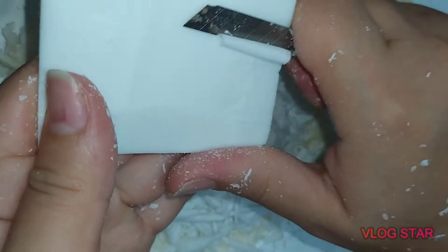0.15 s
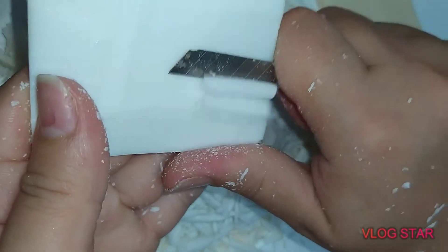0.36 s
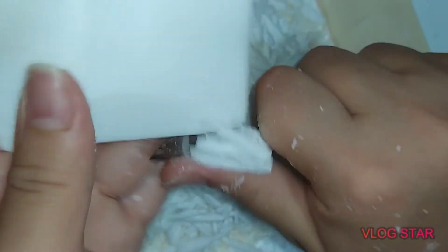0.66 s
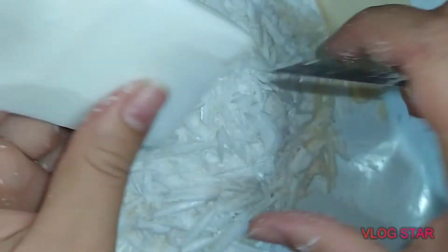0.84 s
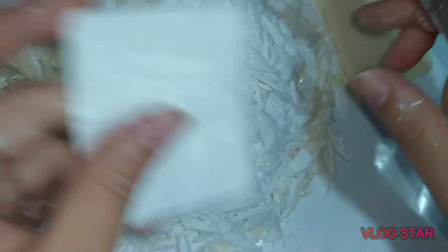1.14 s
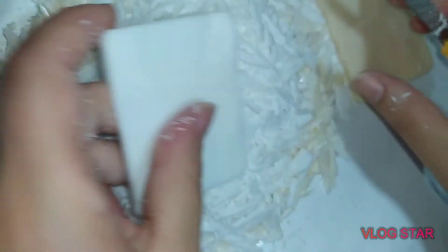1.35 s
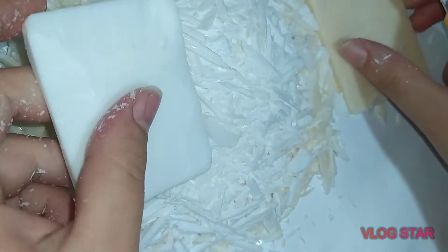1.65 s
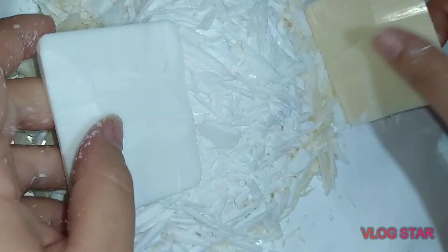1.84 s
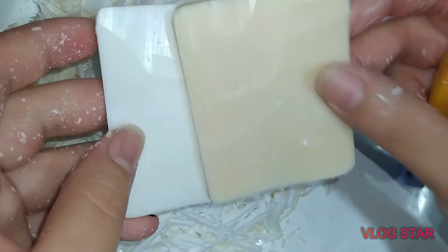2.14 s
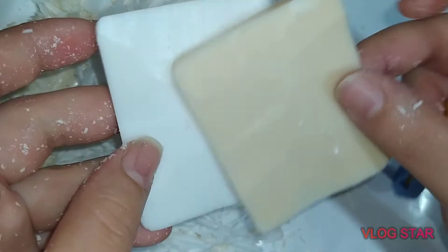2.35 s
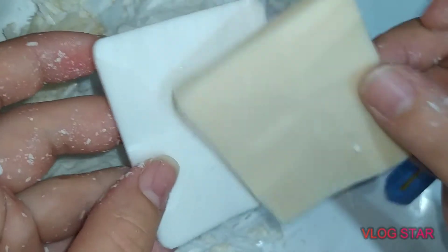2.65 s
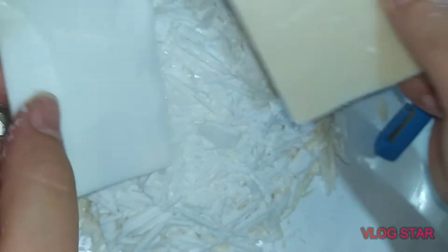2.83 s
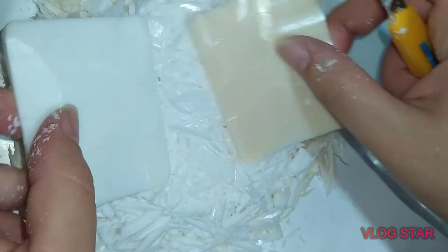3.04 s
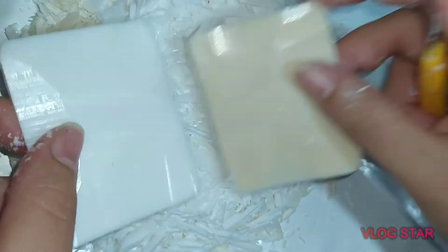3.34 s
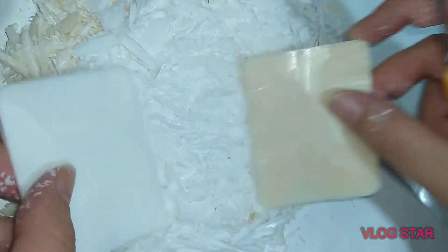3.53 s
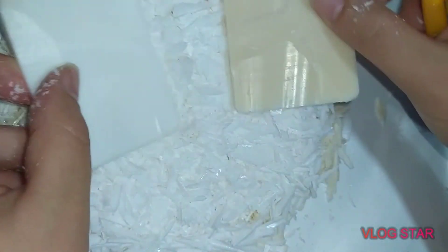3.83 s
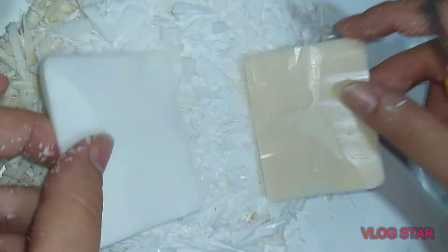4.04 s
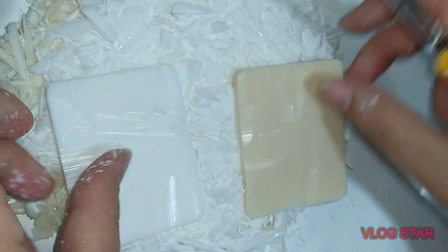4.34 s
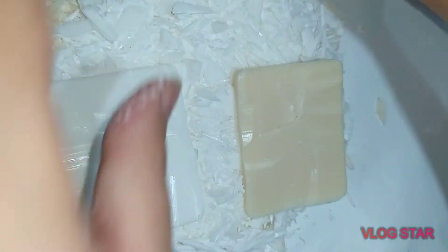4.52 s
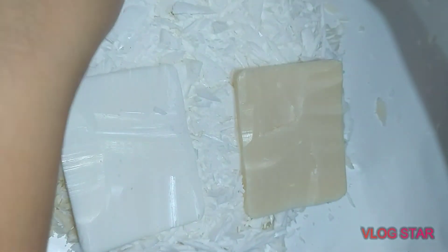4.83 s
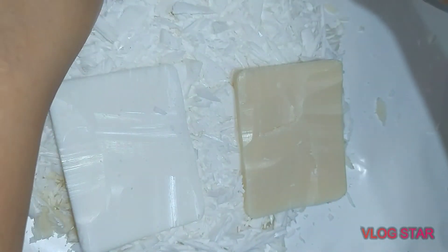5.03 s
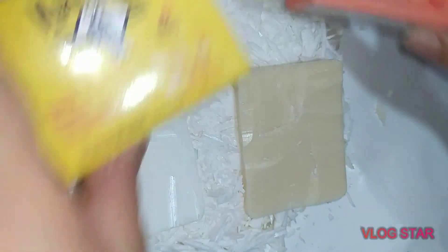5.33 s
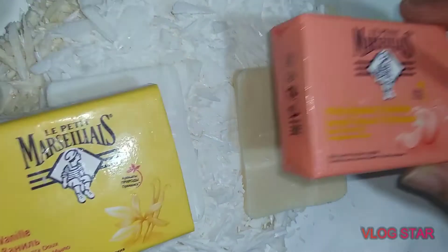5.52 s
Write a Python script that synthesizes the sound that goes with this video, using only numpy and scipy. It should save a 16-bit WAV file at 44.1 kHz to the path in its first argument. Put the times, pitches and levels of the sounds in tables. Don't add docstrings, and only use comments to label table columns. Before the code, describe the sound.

A close two-channel microphone in a small, hard, lightly reverberant room, with faint low hum, rumble and hiss throughout. From 0 to 0.9 s, soft dry blade strokes shave soap, with tiny brittle crumb ticks. A quieter gap follows, with one tick near 1.35 s. At 1.51-1.6 s the bar knocks the table in a fast uneven cluster, a short woody click over a dull thud, then a soft rub at 1.7 s. From 2.18 to 2.67 s a hollow plastic knife slider ratchets in about five clacks roughly 0.12 s apart, some with tight bounces, leaning right. A brisk rustle and light handle tap come at 2.95 s, a bright snap at 3.1 s. Soft scrapes, crumbly clicks and faint thuds continue to 4.2 s, with a barely audible low table groan. Airy rustling swells at 4.5-5.2 s, with crisp snaps at left near 4.74 and 4.84 s and gritty carton scuffs at 5.05-5.15 s, then fades.

```python
import sys
import numpy as np
from scipy import signal
from scipy.fft import rfft, irfft, next_fast_len
from scipy.io import wavfile
from scipy.ndimage import uniform_filter1d

SR = 44100
rng = np.random.default_rng(int(sys.argv[2]) if len(sys.argv) > 2 else 0)


def attenuation_scalar(level_db):
    decades = np.asarray(level_db, float) / 20
    return 10 ** decades


def store_wav(level_fs):
    pcm = np.round(np.clip(np.atleast_2d(level_fs), -1, 1) * 32767)
    wavfile.write(sys.argv[1], SR, pcm.T.astype(np.int16))


N = 250488


def evened(x):
    return x / np.sqrt(np.mean(x ** 2) + 1e-20)


def read(points, hz):
    f, value = np.transpose(points)
    return np.interp(np.log(hz + 1), np.log(f + 1), value)


def add(mix, s, sound, pan_db):
    part = mix[:, round(s * SR):][:, :sound.shape[1]]
    part += sound[:, :part.shape[1]] * attenuation_scalar(np.array([[pan_db / 2], [-pan_db / 2]]))


def coloured(x, points):
    size = next_fast_len(N)
    gain = attenuation_scalar(read(points, np.fft.rfftfreq(size, 1 / SR)))
    return evened(irfft(rfft(x, size) * gain, size)[..., :N])


def filtered(x, order, hz, kind):
    return signal.sosfilt(signal.butter(order, hz, kind, fs=SR, output="sos"), x)


def ring(modes, rise_s, spread):
    t = np.arange(4096) / SR
    hz, db, t60 = np.transpose(modes)[:, :, None]
    detune = 1 + 0.0027 * rng.standard_normal((len(modes), 1))
    phase = spread * rng.standard_normal((2, len(modes), 1))
    waves = attenuation_scalar(db - 60 * t / t60) * np.sin(2 * np.pi * hz * detune * t + phase)
    out = waves.sum(1) * (1 - np.exp(-t / rise_s))
    return out / abs(out).max()


def crack(low_hz, high_hz, t60, rise_s=0.00026):
    t = np.arange(4096) / SR
    noise = rng.standard_normal((3, 4096))
    burst = (noise[:2] + 0.48 * noise[2]) * attenuation_scalar(-60 * t / t60) * (1 - np.exp(-t / rise_s))
    out = filtered(burst, 2, [low_hz, min(high_hz, 21000)], "band")
    return out / abs(out).max()


def swell(top_s, rise_s, fall_s, db):
    t = np.arange(N) / SR - top_s
    drop_db = 17
    return attenuation_scalar(db - drop_db * np.where(t < 0, -t / rise_s, t / fall_s))


# start in seconds, then levels in dB of the hollow body,
# the shell, the latch and the crack.
SLIDER_CLACKS = [
    (2.1779, -28, -28, -25.5, -32.5),
    (2.1846, -33.5, -30, -42, -37),
    (2.302, -17.5, -34.5, -25.5, -30),
    (2.3104, -20, -30, -50, -34.5),
    (2.4293, -27.5, -38.5, -41, -46),
    (2.5397, -31.5, -35.5, -54, -70),
    (2.5465, -19.5, -36, -40, -40.5),
    (2.6561, -30, -58, -45, -47.5),
    (2.6656, -19.5, -36.5, -35, -33.5),
]
# frequency in Hz, level in dB, t60 in seconds.
KNIFE_MODES = [
    [(1351, -1.5, 0.041), (1465, -3.5, 0.066), (1535, 7.5, 0.018)],
    [(2710, -14, 0.023), (2705, 12.5, 0.0067), (3640, 2.5, 0.0015)],
    [(5280, -5.5, 0.0058), (5350, -8.5, 0.017), (5660, -6, 0.0038)],
]


def clacks():
    out, near = np.zeros((2, 2, N))
    body_modes, shell_modes, latch_modes = KNIFE_MODES
    body_pan_db, tooth_pan_db = -10, -2.5
    for s, body_db, shell_db, latch_db, crack_db in SLIDER_CLACKS:
        body = attenuation_scalar(body_db - 2.7) * ring(body_modes, 0.00084, 1.0)
        latch = attenuation_scalar(latch_db - 1) * ring(latch_modes, 0.00031, 1.0)
        shell = attenuation_scalar(shell_db + 5.5) * ring(shell_modes, 0.000087, 0.87)
        bright = attenuation_scalar(crack_db + 13) * crack(7500, 16600, 0.01)
        dull = attenuation_scalar(body_db - 1.5) * crack(630, 6400, 0.014)
        add(out, s + 0.0008, body, body_pan_db)
        add(out, s, shell + bright + dull, tooth_pan_db)
        add(near, s, latch, tooth_pan_db)
    return out, near


# start in seconds, ring level in dB, ring frequency in Hz,
# edge level in dB, left over right in dB.
FINGER_TAP = [
    (2.9694, -34, 1552, -47.5, -1.5),
]


def tap():
    out = np.zeros((2, N))
    for s, ring_db, hz, edge_db, pan_db in FINGER_TAP:
        handle = attenuation_scalar(ring_db + 2.5) * ring([(hz, 0, 0.045), (1450, -9, 0.03)], 0.00022, 0.5)
        edge = attenuation_scalar(edge_db + 12) * crack(570, 7200, 0.011)
        add(out, s, handle + edge, pan_db)
    return out


# start in seconds, then levels in dB of the bar ring, the table thud
# and the crack, left over right in dB.
BAR_KNOCKS = [(1.511, -46, -51.5, -50.5, -4.5), (1.5375, -42, -31, -68, -18), (1.5454, -65, -51, -66, 3),
              (1.5558, -31.5, -74, -43.5, -1.5), (1.5624, -19, -31.5, -43, 7),
              (1.5821, -25.5, -28.5, -52.5, -12.5), (1.5902, -40, -30.5, -66, 13),
              (1.598, -39, -70, -53, -8), (1.923, -63, -47, -70, -7), (2.9016, -75, -44.5, -69, -7.5),
              (3.5672, -66, -49.5, -73, -5.5), (3.874, -61, -47.5, -72, -3), (3.8504, -43.5, -40, -76, -3)]
# frequency in Hz, level in dB, t60 in seconds.
KNOCK_MODES = [
    [(1884, 5, 0.0073), (2355, 8, 0.0062), (2510, 8.5, 0.0059), (2633, 1, 0.016), (3500, -24, 0.0074)],
    [(161.7, -20.5, 0.13), (223.6, -11.5, 0.18), (296, 0.5, 0.076), (347, 7, 0.035), (455.4, 6.5, 0.036),
     (530, 1.5, 0.043), (719, -4.5, 0.06), (1030, -20, 0.027)],
]


def knocks():
    out, table = np.zeros((2, 2, N))
    bar_modes, table_modes = KNOCK_MODES
    for s, bar_db, thud_db, crack_db, pan_db in BAR_KNOCKS:
        thud = filtered(ring(table_modes, 0.004, 0.4), 2, 130, "high")
        add(table, s, attenuation_scalar(thud_db - 3.5) * thud, -1.5)
        bar = attenuation_scalar(bar_db + 2.1) * ring(bar_modes, 0.00019, 0.79)
        dull = attenuation_scalar(bar_db - 4) * crack(550, 3900, 0.013)
        bright = attenuation_scalar(crack_db + 11) * crack(4000, 16000, 0.027)
        add(out, s, bar + dull + bright, pan_db)
    return out, table


# top in seconds, rise in seconds, fall in seconds,
# fine rustle in dB, coarse scrape in dB.
RUB_STROKES = [(0.03, 0.14, 0.35, -66, -74.5), (0.275, 0.016, 0.049, -58, -69.5),
               (0.46, 0.11, 0.33, -63, -75), (0.5, .03, 0.035, -58, -66), (0.7, 0.27, 0.45, -62.5, -93),
               (0.87, 0.31, 0.18, -65, -70), (1.43, 0.23, 0.06, -60, -73), (1.73, 0.17, 0.079, -54, -63.5),
               (1.949, 0.45, 0.12, -62.5, -68), (2.949, 0.069, 0.2, -50, -65),
               (3.2, 0.37, 0.15, -60.5, -65.5), (3.54, 0.11, 0.27, -58, -66.5),
               (3.93, 0.17, 0.16, -55.5, -65), (3.85, 0.041, 0.034, -56, -61.5),
               (4.2, 0.068, .15, -79, -69.5), (4.43, .05, 0.11, -60, -93), (4.545, 0.054, 0.11, -50.5, -84),
               (4.62, .1, 0.1, -46.5, -67), (4.86, 0.24, 0.083, -58, -73.5), (5.06, .1, 0.12, -47, -64.5),
               (5.17, 0.15, 0.087, -48, -65.5), (5.39, .05, .06, -63, -87), (5.58, 0.32, 0.16, -66, -79)]
# frequency in Hz, level in dB per Hz.
FINE_RUSTLE = [(2350, -31), (4000, -11.5), (6090, -12), (8700, -11.5), (9230, -10.5), (14100, -2.5),
               (16100, -7.5), (16500, -47)]
COARSE_SCRAPE = [(410, -20), (700, 2), (917, -9), (1050, -6), (1530, -0.5), (1870, -6), (2670, -6),
                 (5400, -17.5), (7000, -13), (9100, -75), (15400, -120)]


def rubbing():
    size = attenuation_scalar(1.6 * np.minimum(rng.exponential(1, (2, 1, N)), 5))
    happens = rng.random((2, 1, N)) < 9000 / SR
    slips = rng.standard_normal((2, 3, N)) * size * happens
    ports = slips[:, :2] + 0.22 * slips[:, 2:]
    fine, coarse = coloured(ports[0], FINE_RUSTLE), coloured(ports[1], COARSE_SCRAPE)
    out = np.zeros((2, N))
    for top_s, rise_s, fall_s, fine_db, coarse_db in RUB_STROKES:
        slipping = attenuation_scalar(fine_db - 9) * fine + attenuation_scalar(coarse_db + 1) * coarse
        out += swell(top_s, rise_s, fall_s, 0) * slipping
    clump_s, clump_db, pan_db = 0.007, 1.3, -1
    clumps = evened(uniform_filter1d(rng.standard_normal(N), round(clump_s * SR)))
    return out * attenuation_scalar(clump_db * clumps) * attenuation_scalar(np.array([[pan_db], [-pan_db]]) / 2)


# start in seconds, dull snap in dB, ring
# frequency in Hz, fine snap in dB.
SMALL_TICKS = [(0.078, -59.5, 3200, -58), (0.0997, -53.5, 3500, -56.5), (0.1712, -63, 1610, -60),
               (0.2605, -64, 1640, -54.5), (0.2636, -48, 4300, -53), (0.2895, -56, 3310, -58),
               (0.489, -49.5, 1140, -55), (0.5017, -48.5, 1380, -56.5), (0.619, -55, 2010, -57),
               (0.6274, -53, 1410, -52), (0.723, -50.5, 4300, -53), (1.3583, -45, 3460, -55),
               (2.7937, -46, 1440, -63), (2.911, -55, 1550, -53), (3.2313, -55, 1680, -65),
               (3.4401, -45, 3530, -56), (3.5653, -57, 1620, -55), (3.7855, -59, 2820, -57),
               (3.8491, -43.5, 2060, -76), (4.1066, -43, 3750, -46), (4.119, -58, 1570, -58),
               (4.618, -59, 1390, -57), (5.0434, -50, 1770, -55), (5.0524, -49, 1780, -65),
               (5.0964, -49.5, 1720, -66), (5.1437, -38.5, 1920, -49), (5.153, -52, 4450, -56),
               (5.6317, -56.5, 1370, -86)]


def ticks():
    out = np.zeros((2, N))
    for s, dull_db, hz, fine_db in SMALL_TICKS:
        middle_db = min(dull_db, fine_db) - 5
        modes = [(hz, 0, 0.009), (1560, -3, 0.012), (3500, -5, 0.008)]
        dull = attenuation_scalar(1.5) * ring(modes, 0.000082, 0.87) + crack(1100, 3600, 0.02, 0.0011)
        middle = attenuation_scalar(middle_db + 6) * crack(5000, 10000, 0.037, 0.0014)
        fine = attenuation_scalar(fine_db + 6.5) * crack(12000, 17000, 0.026, 0.0016)
        add(out, s, attenuation_scalar(dull_db - 1.5) * dull + middle + fine, -1.5)
    return out


# start in seconds, fine snap in dB, middle snap in dB,
# left over right in dB.
WRAPPER_SNAPS = [
    (1.5315, -50, -47, 4),
    (3.096, -43, -57.5, 2),
    (4.7418, -44, -63, 9.0),
    (4.8405, -37, -58.5, 9.0),
    (4.907, -50, -58, 0),
]


def snaps():
    out = np.zeros((2, N))
    modes = [(13800, -6, 0.0071), (15150, 4, 0.0071), (16200, -9, 0.006)]
    for s, fine_db, middle_db, pan_db in WRAPPER_SNAPS:
        fine = attenuation_scalar(fine_db + 2) * ring(modes, 0.00036, 0.42)
        middle = attenuation_scalar(middle_db + 12) * crack(5500, 12500, 0.0024)
        add(out, s, fine + middle, pan_db)
    return out


# top in seconds, level in dB.
BOX_SCUFFS = [
    (5.052, -49),
    (5.096, -53.5),
    (5.146, -52),
    (5.175, -65),
    (5.21, -67),
]
# frequency in Hz, level in dB per Hz.
CARTON = [(700, -32), (1050, 6), (1350, -36), (1780, 11), (1950, 4), (2400, -20), (4000, -33.5)]


def boxes():
    size = attenuation_scalar(3 * np.minimum(rng.exponential(1, N), 4))
    happens = rng.random(N) < 700 / SR
    grit = rng.standard_normal((2, N)) * size * happens
    rise_s, fall_s = 0.02, 0.014
    return coloured(grit, CARTON) * sum(swell(s, rise_s, fall_s, db) for s, db in BOX_SCUFFS)


def lean():
    spectrum = [(60, -49.0), (95, 15), (115, 5), (135, -7), (200, -42)]  # Hz, dB per Hz
    return coloured(rng.standard_normal(N), spectrum) * swell(4.186, 0.12, 0.15, -65)


# frequency in Hz, t60 in seconds.
ROOM_DECAY = [(200, 0.58), (600, 0.54), (1500, 0.38), (4000, 0.59), (12000, 0.43)]


def room(x, gap_s):
    taps = np.zeros((2, SR))
    slots = np.arange(200, SR - 20, 12)
    at = slots + rng.integers(0, 12, (2, len(slots)))
    np.put_along_axis(taps, at, rng.choice([-1., 1.], at.shape), 1)
    hz, t, z = signal.stft(taps, SR, nperseg=256)
    alike = np.clip(1.9 / (1 + (hz / 900) ** 4), 0, 1)[:, None]
    z[1] = alike * z[0] + np.sqrt(1 - alike ** 2) * z[1]
    decay = attenuation_scalar(-60 * t / read(ROOM_DECAY, hz)[:, None]) * (1 - np.exp(-t / gap_s))
    tail = signal.istft(z * decay, SR, nperseg=256)[1]
    return signal.fftconvolve(x, tail / np.linalg.norm(tail[0]), axes=1)[:, :N]


# frequency in Hz, level in dB per Hz.
QUIET_ROOM = [(3.5, -23), (6.0, 5), (17, -2.5), (129, -22.5), (192, -21.5), (242, -19.5), (397, -22.5),
              (484, -21), (696, -24.5), (820, -28), (2140, -35), (3740, -33.5), (6140, -39), (13600, -43),
              (16000, -36)]
# frequency in Hz, width in Hz, level in dB.
APPLIANCE_HUM = [(108.7, 12, -77.5), (143, 10, -80), (188, 6, -73.5), (341, 17, -75.5), (392.8, 8.8, -72),
                 (447.2, 3.8, -75)]
# frequency in Hz, left-right likeness from -1 to 1.
PORT_LIKENESS = [(30, 0.025), (70, 0.13), (140, 0.6), (600, 0.53), (1300, 0.024), (15000, 0.039)]
# frequency in Hz, left over right in dB.
PORT_TILT = [(60, -2.5), (180, 0), (550, 1.5), (1650, -2), (4970, 1.5), (15000, -5.5)]


def quiet():
    frames, hz = N // 1024 + 5, np.fft.rfftfreq(4096, 1 / SR)
    a, b, c, d, patches = rng.standard_normal((frames, 2049, 5)).T
    patches = evened(uniform_filter1d(uniform_filter1d(patches, 30, 0), 4, 1))
    same = np.clip(read(PORT_LIKENESS, hz), -1, 1)[:, None]
    left = a + 1j * b
    right = same * left + np.sqrt(1 - same ** 2) * (c + 1j * d)
    right = right * attenuation_scalar(-read(PORT_TILT, hz))[:, None]
    broad = attenuation_scalar(read(QUIET_ROOM, hz)) ** 2
    power = attenuation_scalar(-61 + 0.8) ** 2 * broad / broad.sum()
    for f, width, db in APPLIANCE_HUM:
        band = 1 / (1 + (2 * (hz - f) / width) ** 2) ** 2
        power = power + attenuation_scalar(db) ** 2 * band / band.sum()
    z = np.array([left, right]) * np.sqrt(power)[:, None] * attenuation_scalar(0.76 * patches)
    return np.sqrt(power.sum()) * evened(signal.istft(z, nperseg=4096, noverlap=3072)[1][:, :N])


def scene():
    (slider, latch), (bar, table), crumbs, rub = clacks(), knocks(), ticks(), rubbing()
    slider = slider + tap()
    wet = attenuation_scalar(-4) * (slider + attenuation_scalar(-9) * latch) + attenuation_scalar(-3) * bar + attenuation_scalar(-3.5) * table
    wet = wet + attenuation_scalar(-1.5) * crumbs + attenuation_scalar(-14.5) * rub
    direct = slider + latch + bar + table + crumbs + rub + snaps() + boxes()
    return direct + room(wet, 0.0016) + quiet() + lean()


# frequency in Hz, level over the local rms in dB.
WEAKEST_LINE = [(200, -36), (700, -26), (1200, -20), (1700, -11), (3000, -8), (4000, -5), (5000, -1.5),
                (9500, -1), (11500, -3), (13000, -11), (15500, -10)]


def camera_storage(x):
    grid, bins, uneven_db, jump_db = 532, 736, 6, 9.5
    pad = np.pad([x[0] + x[1], x[0] - x[1]], ((0, 0), (2048 - grid, 3072)))
    n, k = np.arange(2048)[:, None], np.arange(bins)
    window = np.sin(np.pi * (n + 0.5) / 2048)
    basis = window * np.cos(np.pi / 1024 * (n + 512.5) * (k + 0.5)) / np.sqrt(512)
    at = 1024 * np.arange(pad.shape[1] // 1024 - 1)[:, None] + n.T
    lines = pad[:, at] @ basis
    local = np.sqrt(uniform_filter1d(lines ** 2, size=64, axis=2) + 1e-20)
    bands = evened(uniform_filter1d(rng.standard_normal(lines.shape[:2] + (46,)), 2, 1))
    bands = np.repeat(bands, 16, axis=2)
    weakest = local * attenuation_scalar(read(WEAKEST_LINE, k * SR / 2048) + uneven_db * bands)
    coarse = lines * (abs(lines) > weakest)
    treble = np.diff(pad[0], 2, prepend=[0, 0])[at[:, 512:1664]]
    bright = (treble.reshape(-1, 9, 128) ** 2).sum(2) + 1e-20
    sharp = (bright[:, 1:] / bright[:, :-1]).max(1) > attenuation_scalar(jump_db) ** 2
    blocks = np.where(sharp[:, None], lines, coarse) @ basis.T
    out = np.zeros_like(pad)
    out[:, :at[-1, 1024]] += blocks[:, :, :1024].reshape(2, -1)
    out[:, 1024:at[-1, -1] + 1] += blocks[:, :, 1024:].reshape(2, -1)
    mid, side = out[:, 2048 - grid:][:, :N] / 2
    top = signal.sosfiltfilt(signal.butter(8, [15850, 16650], "band", fs=SR, output="sos"), x)
    fast, slow = (uniform_filter1d((top ** 2).sum(0), size) for size in (128, 4096))
    opening = uniform_filter1d(1. * (fast > 9 * slow), 128)
    return np.array([mid + side, mid - side]) + top * opening


def band_limit(x):
    return signal.sosfilt(signal.butter(12, 17000, fs=SR, output="sos"), x)


def record(dry):
    mix = camera_storage(dry)
    return band_limit(mix)


dry = scene()
out = record(dry)
store_wav(out)
```